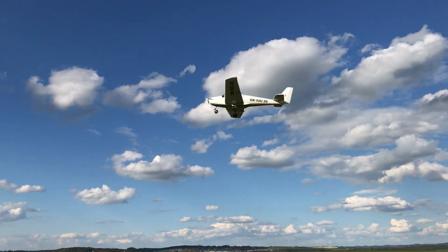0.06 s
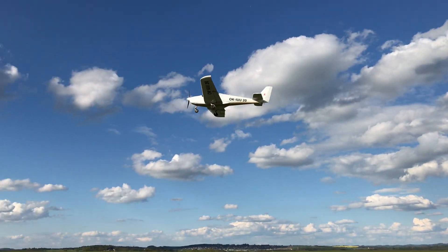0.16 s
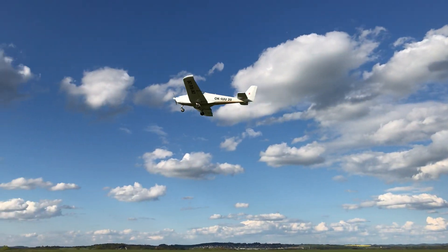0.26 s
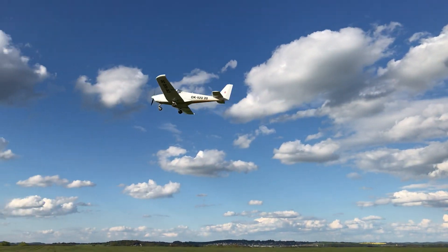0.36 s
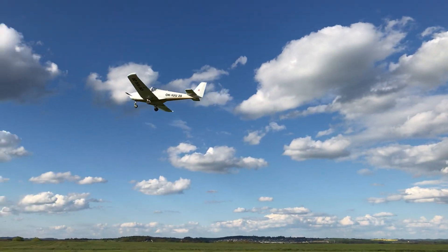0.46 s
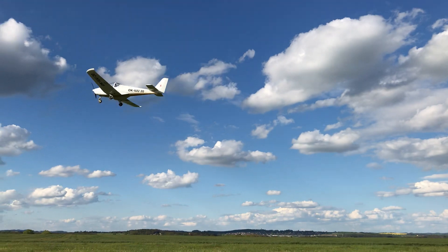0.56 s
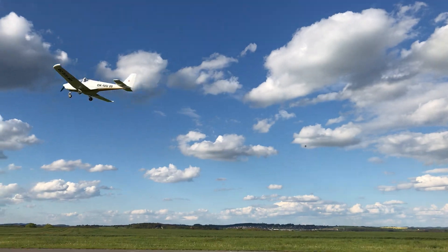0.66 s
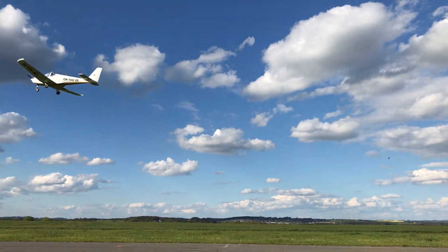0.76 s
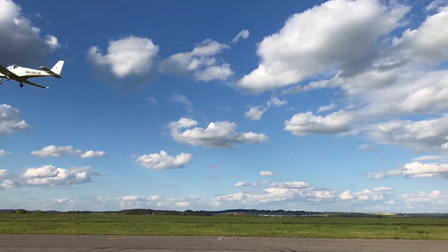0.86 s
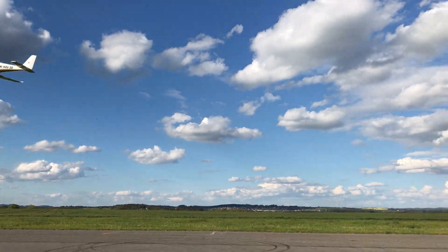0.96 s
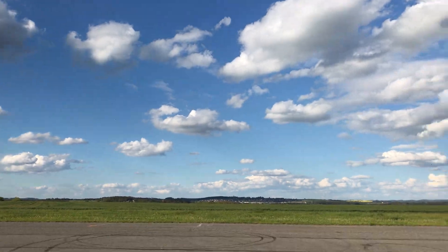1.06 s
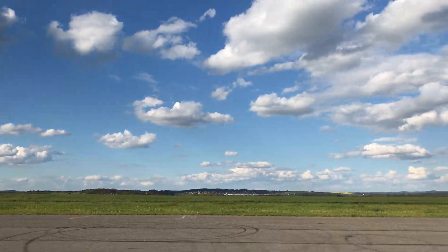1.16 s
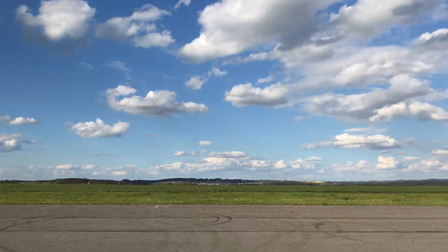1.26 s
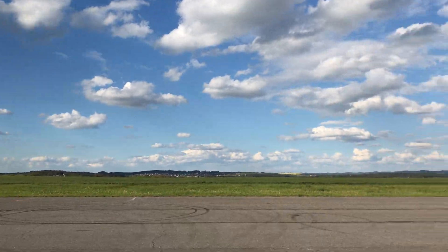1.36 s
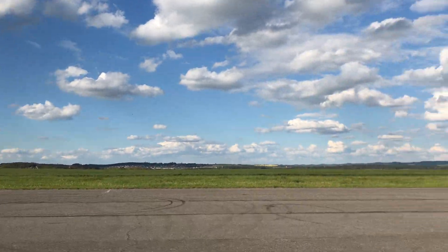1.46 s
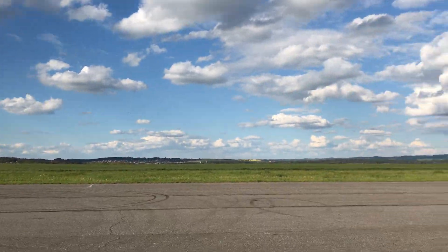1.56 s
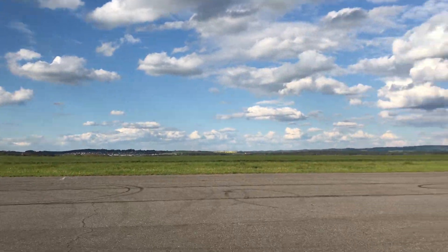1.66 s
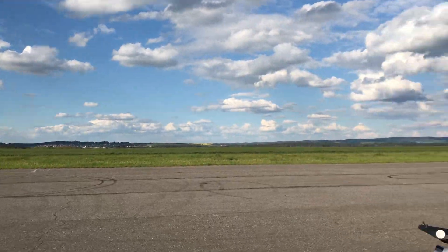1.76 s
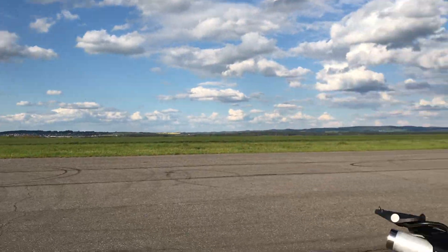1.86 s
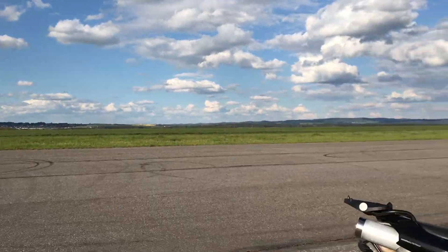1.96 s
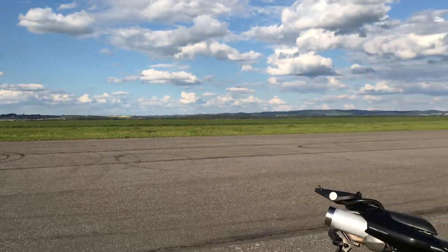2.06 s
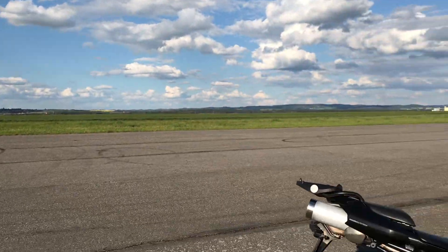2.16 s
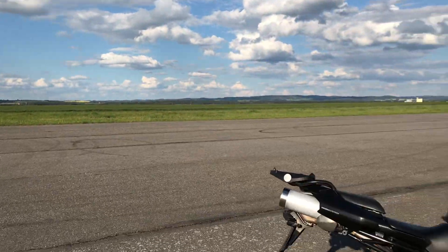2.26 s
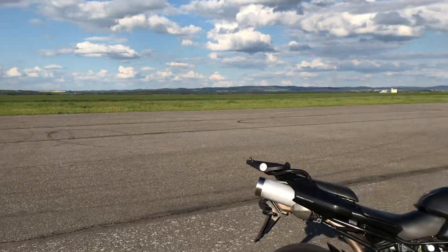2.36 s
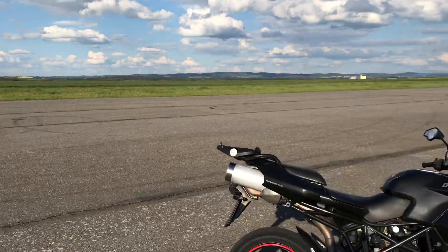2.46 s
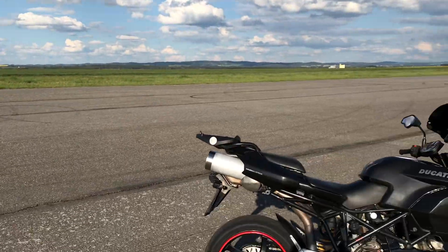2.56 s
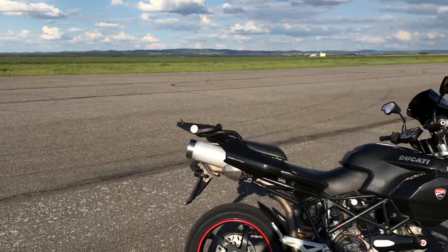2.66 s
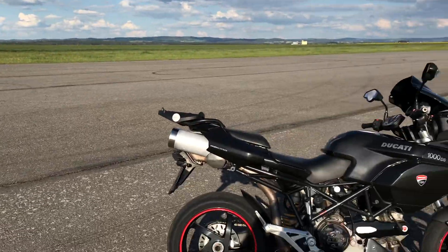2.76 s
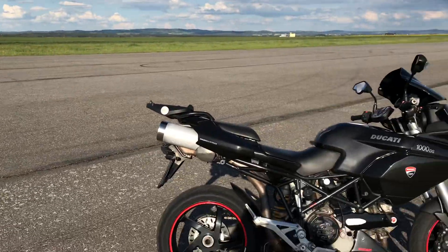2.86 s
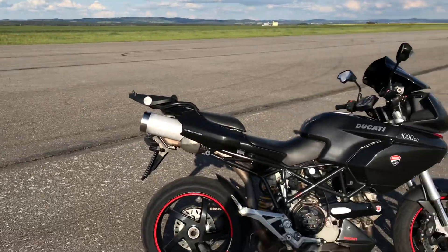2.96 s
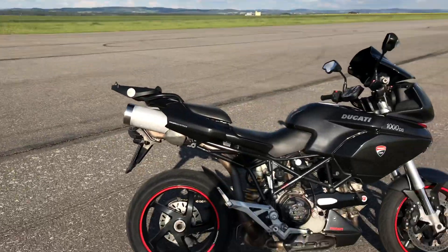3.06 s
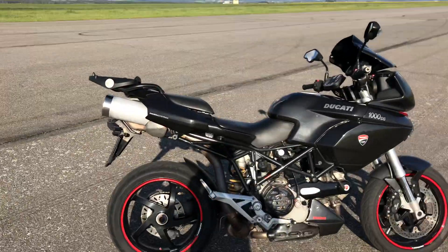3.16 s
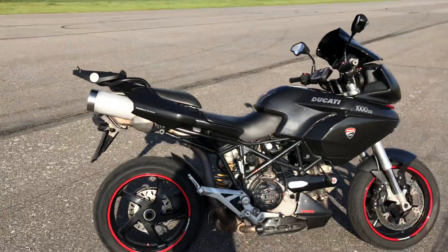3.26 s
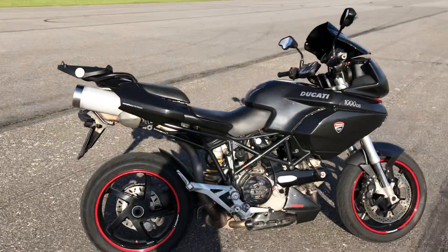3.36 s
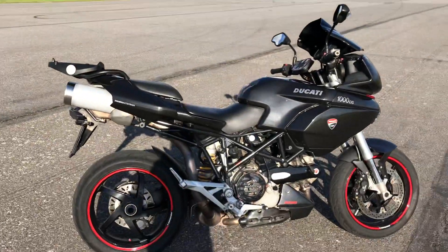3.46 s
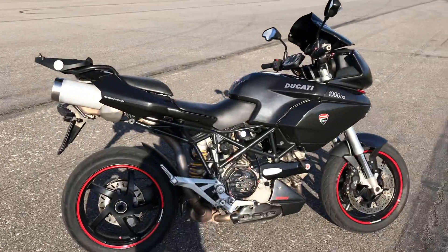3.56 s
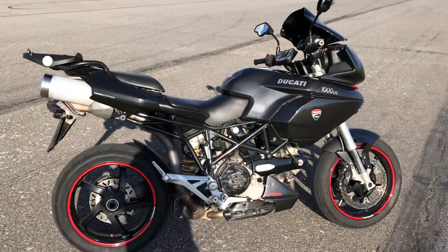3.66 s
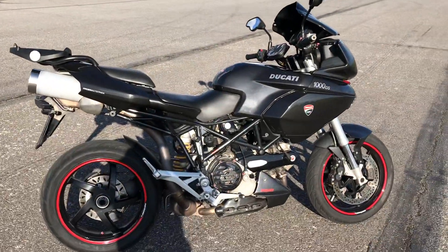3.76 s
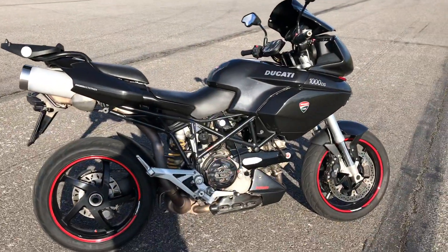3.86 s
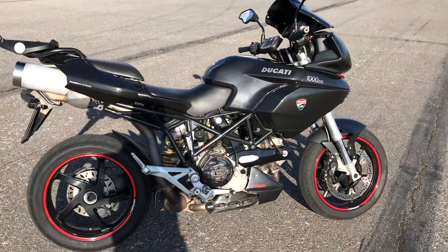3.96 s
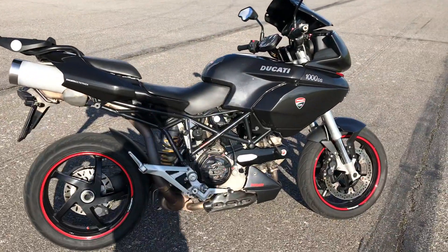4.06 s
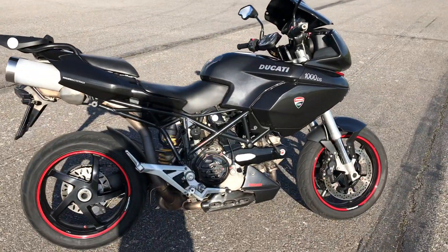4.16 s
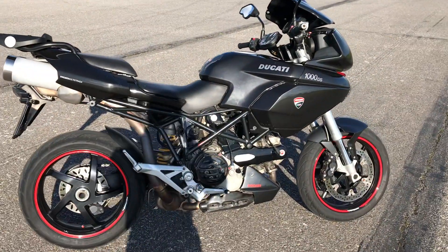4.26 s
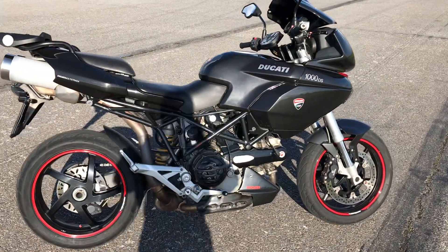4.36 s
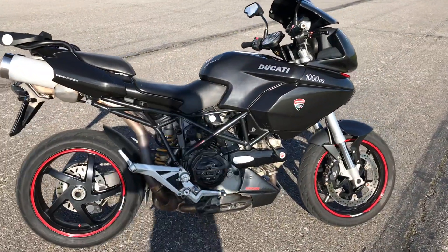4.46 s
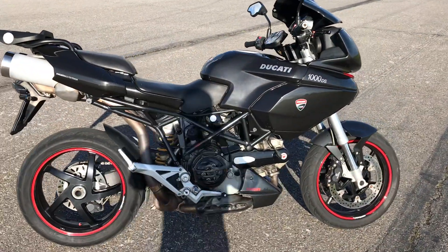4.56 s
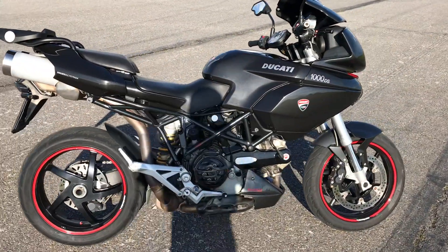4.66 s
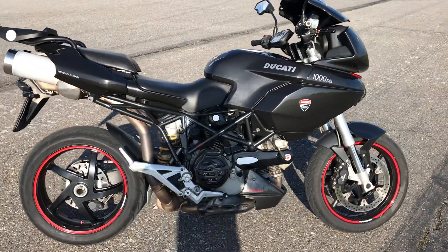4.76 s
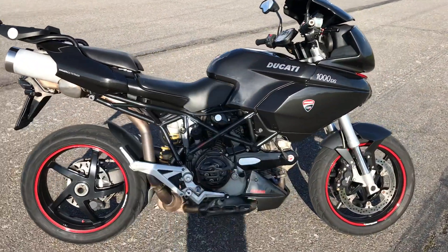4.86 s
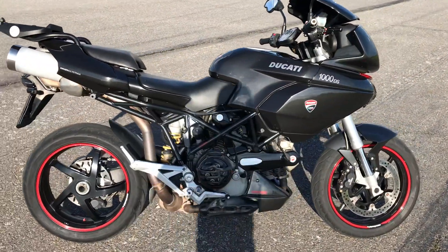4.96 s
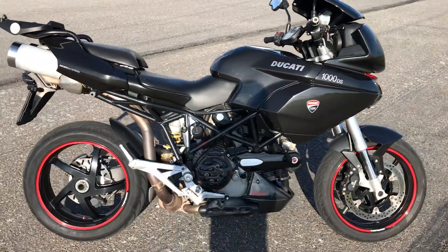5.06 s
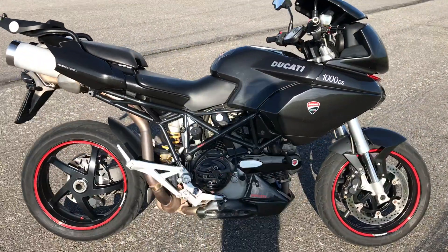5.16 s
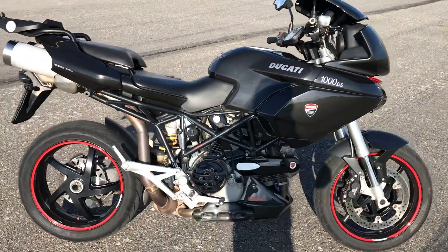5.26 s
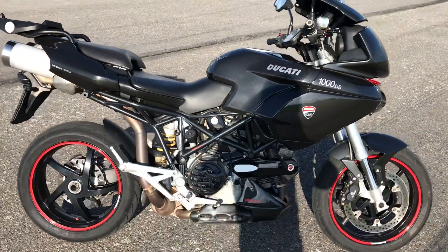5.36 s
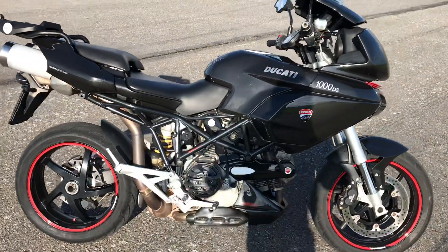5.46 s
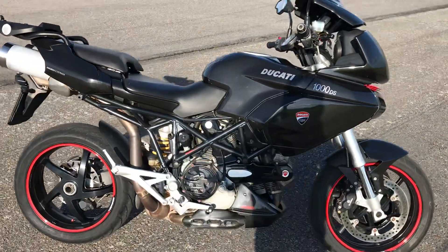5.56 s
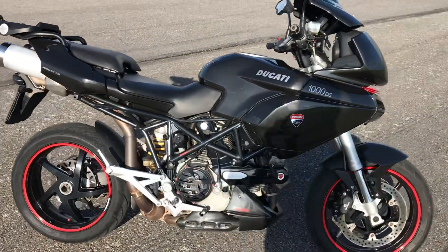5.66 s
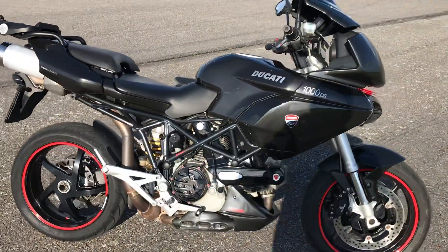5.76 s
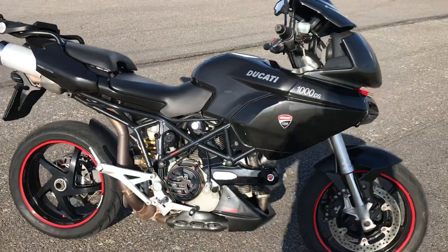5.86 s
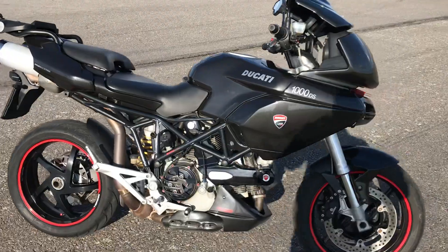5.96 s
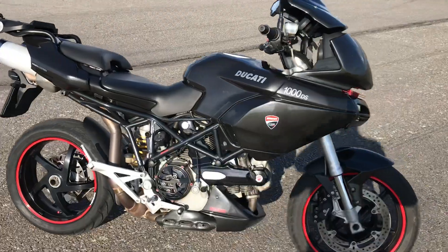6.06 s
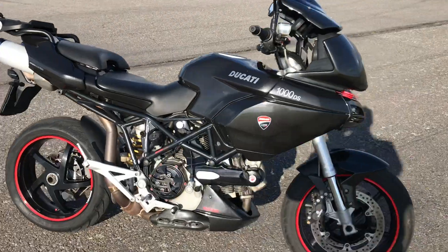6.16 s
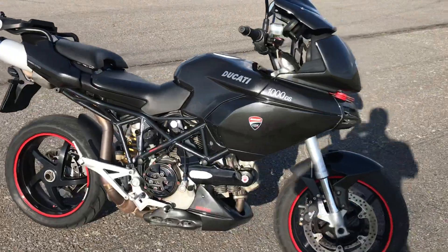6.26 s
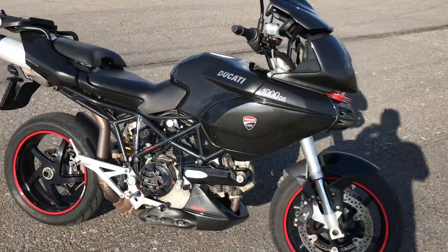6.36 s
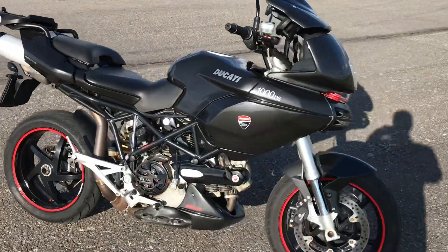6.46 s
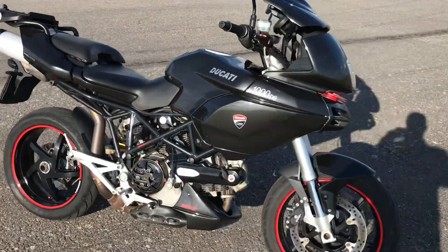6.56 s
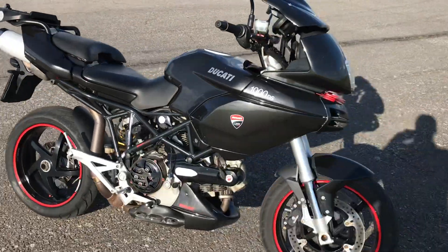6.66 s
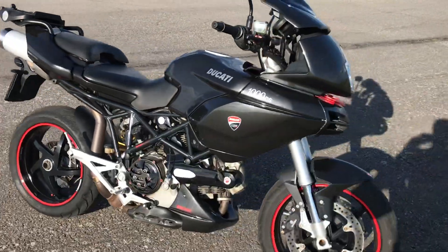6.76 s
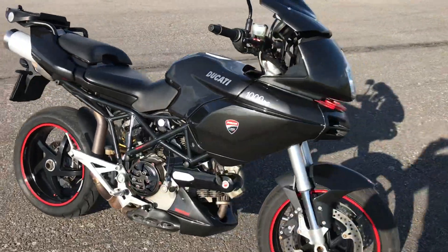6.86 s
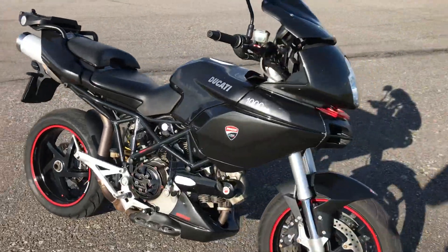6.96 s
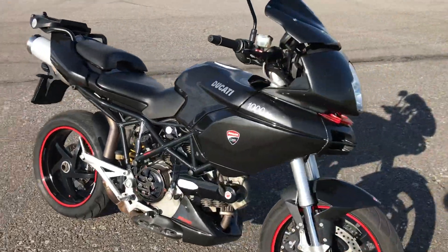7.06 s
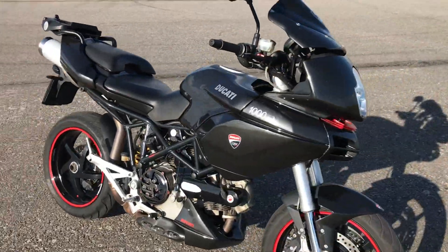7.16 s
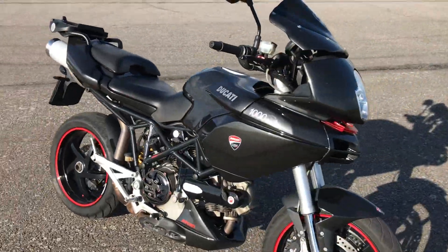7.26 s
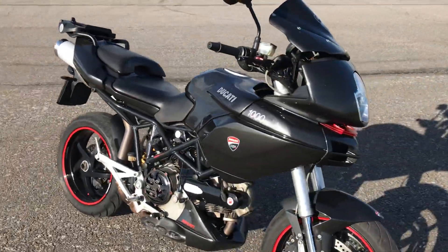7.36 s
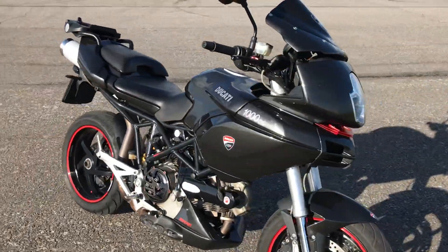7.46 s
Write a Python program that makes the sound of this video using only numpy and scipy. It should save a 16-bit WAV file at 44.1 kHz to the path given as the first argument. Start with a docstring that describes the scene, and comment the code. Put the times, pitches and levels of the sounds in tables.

```python
"""A light propeller plane has just passed low over an open airfield and climbs away, its note sinking.
The geared two-blade propeller hums as a stack of sine lines; the four-cylinder exhaust rasps as coloured
noise, steep shocks and lines on the engine cycle. A delayed echo off the tarmac sweeps a comb through both.
As the plane fades, wind noise, thumps and knocks buffet the microphone.
Far off, a small bird twitters in gliding whistles."""
import sys
import numpy as np
from scipy import signal
from scipy.fft import rfft, irfft
from scipy.io import wavfile
from scipy.ndimage import uniform_filter1d, minimum_filter1d, map_coordinates

SR = 44100
rng = np.random.default_rng(int(sys.argv[2]) if len(sys.argv) > 2 else 0)


def store_pcm(level_fs):
    """Save levels as 16-bit WAV."""
    pcm = np.round(np.clip(level_fs, -1, 1) * 32767).astype(np.int16)
    wavfile.write(sys.argv[1], SR, np.atleast_2d(pcm).T)


N = 330750
TIME = np.arange(N) / SR
CUTOFF_HZ = 15700   # top of the finished sound


def from_db(db):
    """Decibels to gain."""
    return 10 ** (np.asarray(db) / 20)


def rms_one(x):
    """Scale to unit power."""
    return x / np.sqrt(np.mean(x ** 2) + 1e-20)


def evened(x):
    """Hold the slow level at 1."""
    return x / np.sqrt(uniform_filter1d(x * x, size=6000) + 1e-12)


def in_time(rows):
    """One curve over time for each column of a table."""
    s, *columns = np.transpose(rows)
    return [np.interp(TIME, s, column) for column in columns]


def hump(s, half_s):
    """A Gaussian bell of height 1 around a moment."""
    return np.exp(-((TIME - s) / half_s) ** 2 / 2)


def receding(near, far, half_s, width_s):
    """A smooth step from the value close by to the value far off, half done at half_s."""
    return far + (near - far) * (1 - np.tanh((TIME - half_s) / width_s)) / 2


def drift(rate_hz):
    """Smoothed chance with a spread of 1, drawn at every 40th sample."""
    step = 40
    r = np.exp(-2 * np.pi * rate_hz * step / SR)
    noise = rng.standard_normal(N // step + 2002)
    slow = rms_one(signal.lfilter([1], [1, -2 * r, r * r], noise)[2000:])
    return np.interp(np.arange(N) / step, np.arange(len(slow)), slow)


def coloured(x, spectrum):
    """Give a sound a spectrum; unit power."""
    hz, db = np.transpose(spectrum)
    bins = np.maximum(np.fft.rfftfreq(N, 1 / SR), 1)
    gain = from_db(np.interp(np.log(bins), np.log(hz), db))
    return rms_one(irfft(rfft(x) * gain, N))


def band(x, edges_hz, kind, order=2):
    """Butterworth filter."""
    return signal.sosfilt(signal.butter(order, edges_hz, kind, fs=SR, output="sos"), x)


def dulled(x, corner_hz):
    """Gentle low-pass without delay."""
    return signal.sosfiltfilt(signal.butter(1, corner_hz, fs=SR, output="sos"), x + 1e-18)


def delayed(x, lag_ms):
    """Read a sound a little later, between samples if need be."""
    return map_coordinates(x, [np.arange(N) - lag_ms * SR / 1000], order=3)


def background_hiss():
    """Faint even white noise."""
    return from_db(-80.0) * rng.standard_normal(N)


# bird notes: start_s, length_s, first_hz, last_hz, level_db (before the bird's fader), quiver_share (of pitch)
BIRD_NOTES = [(4.54, 0.22, 3080, 2710, -67, 0.022), (5.09, 0.1, 4870, 4550, -79, 0.0088),
              (5.56, 0.053, 5900, 5300, -71, .014), (5.635, 0.041, 5200, 4950, -74, .014),
              (5.66, .03, 4650, 4400, -65, .012), (5.715, 0.029, 5300, 4950, -72, .012),
              (5.773, 0.093, 3710, 3690, -58.5, 0.0087), (5.857, 0.19, 3700, 3660, -62.5, 0.026),
              (6.184, 0.26, 3770, 3720, -63, 0.042), (6.33, 0.12, 4670, 4540, -65, 0.024),
              (6.52, .125, 4980, 4760, -70.5, 0.013), (6.635, .03, 4760, 4280, -71, 0.014),
              (6.82, .05, 5420, 5620, -70, .022), (7.436, .07, 4210, 3860, -63, .02)]


def bird():
    """Thin gliding whistles and buzzy notes: quick random pitch quiver makes the buzz, and the level flutters."""
    out, quiver, flutter = np.zeros(N), drift(290), from_db(2 * drift(40))
    for s, length_s, first_hz, last_hz, db, rough in BIRD_NOTES:
        on = (TIME >= s) & (TIME < s + length_s)
        part = (TIME[on] - s) / length_s
        hz = (first_hz + (last_hz - first_hz) * part) * (1 + rough * quiver[on])
        swell = np.sqrt(2 * np.abs(np.sin(np.pi * part)))
        out[on] += from_db(db) * swell * np.sin(2 * np.pi * np.cumsum(hz) / SR)
    return out * flutter


# spectrum of wind on the microphone: pitch_hz, relative_level_db (per Hz)
WIND_COLOUR = [(20, -11), (35, -6), (55, 7), (80, 2), (150, -1), (230, -6.5), (400, -17.5), (700, -24),
               (1500, -27), (5000, -63)]
# gusts: centre_s, half_length_s (of the bell in power), level_db, low_pass_hz
GUSTS = [(.3, 0.27, -32.5, 291.4), (1.746, 0.046, -28.5, 148), (2.76, 0.12, -34.5, 200),
         (3.57, 0.11, -31, 500), (4.146, 0.29, -33.5, 586), (4.843, 0.44, -33, 121),
         (5.577, 0.25, -34, 312)]
BREEZE_DB = -41.5   # wind between gusts


def wind(lumpy_db):
    """Lumpy low rumble of eddies on the microphone port: a light breeze, with gusts that each reach their own pitch."""
    def eddies():
        lumpy = rng.standard_normal(N) * from_db(lumpy_db * drift(35))
        return coloured(lumpy, WIND_COLOUR)

    out = from_db(BREEZE_DB) * evened(eddies())
    for s, half_s, db, top_hz in GUSTS:
        out += from_db(db) * np.sqrt(hump(s, half_s)) * evened(band(eddies(), top_hz, "low"))
    return out


# single buffets: centre_s, level_db, half_length_s, centre_hz
BUFFETS = [(3.518, -21, 0.009, 80), (3.645, -36, 0.018, 149), (3.682, -28, 0.0079, 130),
           (3.905, -29, 0.0083, 89.5), (3.975, -34, 0.012, 129), (4.233, -38, 0.0044, 176),
           (4.266, -35, 0.016, 159), (4.348, -38, 0.012, 239), (4.941, -21.5, 0.016, 95),
           (5.007, -24.5, 0.0055, 296), (5.045, -22.5, 0.0053, 247), (5.061, -23.5, 0.022, 67),
           (5.457, -20.5, 0.012, 317), (5.466, -23, 0.023, 133), (5.575, -32.5, 0.0035, 286),
           (5.668, -33.5, 0.01, 312), (5.694, -29.5, 0.02, 117), (5.734, -29, 0.0037, 282),
           (6.018, -37.5, 0.03, 93), (6.873, -25, 0.0065, 59.7)]
BUFFET_OCTAVES = 1.48   # width of a buffet's thump
TEAR_DB = -15   # a buffet tears at its crests
# band of the tearing noise: low_hz, high_hz
TEAR_BAND = [500, 1610]


def buffets():
    """Single strong eddies thump on the port: short swells of band noise, each around its own pitch."""
    out, t = np.zeros(N), np.arange(-SR // 4, SR // 4) / SR
    for s, db, half_s, centre_hz in BUFFETS:
        swell = np.exp(-(t / half_s) ** 2 / 2)
        edges_hz = centre_hz * 2 ** (BUFFET_OCTAVES * np.array([-.5, .5]))
        eddy = band(rng.standard_normal(len(t)), edges_hz, "band")
        tear = from_db(TEAR_DB) * rms_one(band(rng.standard_normal(len(t)), TEAR_BAND, "band"))
        puff = swell * band(eddy + swell * np.abs(eddy) * tear, 1500, "low", order=4)
        same_energy = np.sqrt(np.sum(swell ** 2) / np.sum(puff ** 2))
        at = round((s + t[0]) * SR)
        out[at:at + len(t)] += from_db(db) * puff * same_energy
    return out


# eddies that break right on the port with one sharp knock: centre_s, peak_db, half_length_s
KNOCKS = [(3.457, -17, 0.0018), (3.553, -17, 0.0019), (3.559, -27, 0.0012), (3.587, -19, .002),
          (3.667, -19, 0.0015), (3.69, -20, 0.0023), (3.969, -22, 0.0017), (4.243, -21.5, 0.0015),
          (4.285, -21, 0.0018), (4.364, -28, 0.00095), (4.94, -12, 0.002), (5.016, -13, 0.00057),
          (5.051, -13, 0.00077), (5.462, -9.5, 0.00065), (5.467, -9, 0.00096), (5.658, -29, 0.00096),
          (5.708, -17, 0.0032), (5.861, -27, 0.0016), (6.031, -22, 0.0027)]


def knocks():
    """A quick suck of pressure with a rebound on either side."""
    out, t = np.zeros(N), np.arange(-SR // 20, SR // 20) / SR
    for s, db, half_s in KNOCKS:
        at, u = round((s + t[0]) * SR), (t / half_s) ** 2
        out[at:at + len(t)] += from_db(db) * (u - 1) * np.exp(-u / 2)
    return out


# lag of the echo off the tarmac: time_s, lag_ms
ECHO_LAG = [(0, 3.22), (.5, 3.24), (.7, 3.04), (1.0, 2.92), (1.22, 2.56), (1.45, 2.47), (1.85, 2.14),
            (2.25, 1.77), (2.65, 1.58), (2.85, 1.39), (3.8, 1.32), (4.7, 1.08), (6.2, 1.11), (7.5, 1.07)]


def tarmac_echo(x, low_gain, far_gain, blur_hz, wander_ms):
    """The ground mirrors the plane; the lag shrinks as it sinks towards the horizon."""
    lag_ms, = in_time(ECHO_LAG)
    high_gain = receding(near=0.91, far=far_gain, half_s=1.26, width_s=1.6)
    low = dulled(x, blur_hz)
    mirrored = low_gain * low + high_gain * (x - low)
    return x + delayed(mirrored, lag_ms + wander_ms * drift(6.8))


# late on the plane banks and shows its side again: most parts recover a little, the propeller overtones sink
BANK_S, BANK_HALF_S = 7.28, 0.42


def fading(near_db, far_db, half_s, width_s, bank_db):
    """Level of one part of the plane's sound: it falls with distance and shifts by bank_db in the bank."""
    return receding(near_db, far_db, half_s, width_s) + bank_db * hump(BANK_S, BANK_HALF_S)


def tone(turns, waver_db, smear):
    """A sine line whose level and phase waver in turbulent air; smear is in radians."""
    phase = 2 * np.pi * (turns + rng.random()) + smear * drift(11.7)
    return np.sqrt(2) * np.sin(phase) * from_db(waver_db * drift(1.77))


LINE_WAVER_DB, LINE_SMEAR = 1.6, .06   # the lines hold nearly steady in level and phase (radians)


def lines(cycle, table):
    """Unequal cylinders give lines on multiples of the cycle rate."""
    return sum(from_db(db) * tone(k * cycle, LINE_WAVER_DB, LINE_SMEAR) for k, db in table)


def swish(blade):
    """Each blade throws a puff of tip noise at the listener while the plane is abeam."""
    place, sharpness = .62, 3   # place in the blade pass (0-1), how briefly it sounds
    gate = rms_one(np.exp(sharpness * np.cos(2 * np.pi * (blade - place))))
    noise = rms_one(band(rng.standard_normal(N), [900, 1900], "band"))
    level_db = receding(near=-25, far=-63.5, half_s=1.26, width_s=0.59)
    return from_db(level_db) * gate * noise


def buzz(blade, cycle, fall_db):
    """The crank's ripple shifts the high blade harmonics; their hump slides down as the plane turns its tail."""
    centre = receding(near=18.7, far=8.96, half_s=0.14, width_s=2.06)   # loudest harmonic
    level_db = fading(near_db=-29.5, far_db=-55.0, half_s=2.86, width_s=1.98, bank_db=6.0)
    out = 0
    for k in range(8, 21):
        line_db = level_db - fall_db * np.abs(k - centre)
        out = out + from_db(line_db) * tone(k * blade - 2 * cycle, waver_db=0.5, smear=0.21)
    return out


# the propeller is loudest just behind its disc; its tone dies away as the plane shows its tail
LOBE_S, LOBE_DB, LOBE_RISE_DB_PER_S, LOBE_FALL_DB_PER_S = 0.56, -16, 17.5, 6
TAIL_ON_S, TAIL_ON_DB, BLADE_FAR_DB = 2.75, -5.5, -52


def blade_level(bank_db):
    """The propeller's lobe sweeps over the listener and leaves a faint hum."""
    before_db, after_db = LOBE_RISE_DB_PER_S * (LOBE_S - TIME), LOBE_FALL_DB_PER_S * (TIME - LOBE_S)
    lobe_db = LOBE_DB - np.maximum(before_db, after_db)
    tail_db = receding(0, TAIL_ON_DB, TAIL_ON_S, width_s=0.093)
    return np.maximum(lobe_db + tail_db, BLADE_FAR_DB + bank_db * hump(BANK_S, BANK_HALF_S))


# overtones of the blade tone: harmonic, level_db (before their shared fade)
OVERTONES = [(2, 4), (3, -4.5), (4, -7.5), (5, -22)]
# low exhaust lines around the firing tone: cycle_multiple, level_db (before their shared fade)
THROB_LINES = [(2, -4.5), (3, -11.5), (4, 2.5)]
# the growl above them, which the tail screens off and the bank brings back: cycle_multiple, level_db (before fade)
GROWL_LINES = [(5, -12), (6, -9), (7, -9.5), (8, -7), (9, -11.5), (10, -18.5), (11, -9.5)]


def drone(blade, cycle):
    """The blade tone with its overtones, the throb around four firings a cycle, and the growl above it."""
    overtone_db = fading(near_db=-23.0, far_db=-57.0, half_s=1.76, width_s=0.89, bank_db=-11)
    throb_db = fading(near_db=-32.0, far_db=-56.5, half_s=3.02, width_s=1.32, bank_db=11.5)
    growl_db = fading(near_db=-34.0, far_db=-60.0, half_s=3.0, width_s=1.0, bank_db=16.5)
    hum = from_db(blade_level(bank_db=4.0)) * tone(blade, waver_db=-0.5, smear=0.033)
    overtones = sum(from_db(db) * tone(k * blade, LINE_WAVER_DB, 2 * LINE_SMEAR) for k, db in OVERTONES)
    throb = from_db(throb_db) * lines(cycle, THROB_LINES)
    growl = from_db(growl_db) * lines(cycle, GROWL_LINES)
    return hum + from_db(overtone_db) * overtones + throb + growl


# moving air makes the exhaust swell and sink: centre_s, half_length_s, bass_db, treble_db
SWELLS = [(1.227, 0.51, -2.5, 4.5), (2.063, 0.063, -0.5, 5), (2.36, 0.15, -0.5, 9), (3.07, 0.11, 2.5, 4.5),
          (3.49, 0.075, 1, 5), (3.74, 0.1, -1.5, -2.5), (4.934, 0.2, 3.5, 4.5), (5.31, 0.088, 6, 6.5),
          (5.612, 0.12, -1.5, 0), (6.091, 0.16, 6.5, 5), (6.41, 0.073, 3.5, 7), (6.933, 0.025, -3, 9),
          (7.063, 0.12, -6, -3), (7.2, 0.025, 3, 3), (7.33, 0.025, 1.5, 4.5), (7.473, 0.022, 0, 5.5)]


def exhaust_levels(flicker_db):
    """Roar, rasp and hiss in dB; the hiss falls furthest and flickers most."""
    bass_db = sum(db * hump(s, half_s) for s, half_s, db, _ in SWELLS)
    treble_db = sum(db * hump(s, half_s) for s, half_s, _, db in SWELLS) + flicker_db * drift(5.5)
    roar_db = fading(near_db=-16.5, far_db=-47.5, half_s=2.72, width_s=2.5, bank_db=6.5) + bass_db
    rasp_db = fading(near_db=-20.5, far_db=-51.0, half_s=2.09, width_s=1.39, bank_db=6.5)
    rasp_db = rasp_db + (bass_db + treble_db) / 2
    hiss_db = fading(near_db=-20.5, far_db=-65.5, half_s=2.2, width_s=1.85, bank_db=1.5) + treble_db
    return roar_db, rasp_db, hiss_db


# the cylinders fire unequally, only two hard enough to crack: cycle_place (0-1),
# level_db (in full for the shocks, halved for the puffs)
FIRINGS = [(0, 2.5), (0.27, -6)]
PUFF_SPREAD_DB, SHOCK_SPREAD_DB = 1.5, 2.5   # no two puffs or shocks are equally strong


def exhaust_bursts(cycle, cycle_hz, crack_s, tail_s, tail_db, repeat, crack_hz):
    """Steady rush, plus a puff of gas with a short tail at each firing; part of the treble repeats each cycle."""
    crack_db = receding(near=7.26, far=2.8, half_s=2.7, width_s=0.48)   # the air blurs puffs from afar
    burst = 0
    for place, db in FIRINGS:
        age_s = ((cycle - place) % 1) / cycle_hz
        firing = (cycle + 1 - place).astype(int)
        uneven_db = PUFF_SPREAD_DB * np.tanh(rng.standard_normal(size=400))[firing]
        decay = np.exp(-age_s / crack_s) + from_db(tail_db) * np.exp(-age_s / tail_s)
        burst = burst + from_db(crack_db + db / 2 + uneven_db) * decay
    pattern = rng.standard_normal(size=256)
    places = np.arange(len(pattern)) / len(pattern)
    repeated = np.interp(cycle + 0.0033 * drift(11.3), places, pattern, period=1)
    rush = rng.standard_normal(N) + repeat * band(repeated, [1800, 4500], "band")
    crack = rush * (np.sqrt(1 + burst ** 2) - 1)
    return rush + band(crack, crack_hz, "low", order=1)   # the puffs are duller than the rush


def shimmer(x, near_db, far_db):
    """Eddies in the air let neighbouring pitch regions swell and fade apart, about equally near and far."""
    bins, centres_hz = np.fft.rfftfreq(N, 1 / SR), np.geomspace(500, 8000, num=16)
    spectrum, patchy_db = rfft(x), receding(near_db, far_db, half_s=4.9, width_s=1.0)
    out = 0
    for peak in np.eye(len(centres_hz)):
        region = irfft(spectrum * np.interp(bins, centres_hz, peak), N)
        out = out + region * from_db(patchy_db * drift(12.5))
    return out


# exhaust colour from the side: pitch_hz, relative_level_db (per Hz)
ABEAM = [(60, -7), (150, -24), (300, -1), (600, -5.5), (1200, -4), (1550, -5), (2100, -6), (2900, 2),
         (3600, -2.5), (4200, 3), (5000, -2), (6500, -3.5), (10400, -17), (15700, -26.5)]
# exhaust colour going away: pitch_hz, relative_level_db (per Hz)
ASTERN = [(60, -2), (200, 0), (600, -1.5), (1150, 2.5), (1550, 4), (1950, -4.5), (2600, 6), (3200, -5.5),
          (3800, 1.5), (4900, -13.5), (6000, -12), (8000, -24.5), (10300, -33.5), (11500, -42),
          (15700, -83)]
# exhaust colour far off: pitch_hz, relative_level_db (per Hz)
FAR = [(60, -33), (200, -25), (400, 11), (650, 9), (1000, 4), (1400, 3), (1900, 5), (2350, -5),
       (3200, -9.5), (3800, -9), (4800, -23), (6500, -32.5), (8000, -44.5), (10400, -51), (15700, -42)]


def exhaust_noise(bursts, roar_db, rasp_db, hiss_db):
    """The colour turns as the plane shows its tail; roar, rasp and hiss are three bands with their own levels."""
    turns_at_s = [.6, 2.3, 3.1, 4.6]
    noise = np.interp(TIME, turns_at_s, [0.44, 0.041, 0.1, 0.00053]) * coloured(bursts, ABEAM)
    noise += np.interp(TIME, turns_at_s, [0.017, 1, 1.0, 0.0066]) * coloured(bursts, ASTERN)
    noise += np.interp(TIME, turns_at_s, [0.0, 0.2, 0.6, 0.46]) * coloured(bursts, FAR)
    roar_db = roar_db + receding(near=-6.5, far=-3.0, half_s=0.69, width_s=0.5)
    hiss_db = hiss_db + receding(near=-0.4, far=4.1, half_s=2.6, width_s=0.8)
    roar = from_db(roar_db) * evened(band(noise, 1827, "low", order=6))
    rasp = from_db(rasp_db - 2.0) * evened(band(noise, [1800, 4800], "band", order=5))
    hiss = from_db(hiss_db) * evened(band(noise, 4505, "high", order=6))
    return roar + rasp + hiss


# the pipe's ring swells as peaks of the tarmac-echo comb sweep across its pitch: centre_s, half_length_s, level_db
RING_SWELLS = [(0.763, 0.17, 11), (1.33, 0.097, 16.5), (2.046, 0.078, 13.5)]
RING_HZ, RING_WIDTH_HZ = 2600, 146   # nasal ring of the pipe
SHOCK_LAG_S = 0.00024   # from a firing to its shock
PIPE_TRIP_MS = 0.747   # the shock runs back along the pipe and comes out once more
EDGE_DB = -20   # the steepest part of the shock, heard only close by; before its bandwidth boost


def exhaust_shocks(cycle, uneven_db, jitter_s, near_low_hz, far_low_hz, near_hz, far_hz, pipe_hz):
    """Each firing leaves the pipe as one steep shock, then again after a pipe trip; distance rounds the front."""
    clicks = np.zeros(N + 1)
    for place, db in FIRINGS:
        s = np.interp(np.arange(1, int(cycle[-1])) + place, cycle, TIME)
        late, strong = rng.standard_normal((len(s), 2)).T
        position = np.clip((s + SHOCK_LAG_S + jitter_s * late) * SR, 0, N - 1)
        at, part = np.divmod(position, 1)   # share each click between two samples
        strength = from_db(db + uneven_db * np.tanh(strong))
        clicks[at.astype(int)] += strength * (1 - part)
        clicks[at.astype(int) + 1] += strength * part

    def front(low_hz, top_hz):
        shape = band(signal.unit_impulse(256), low_hz, "high", order=1)
        shape = band(shape, top_hz, "low", order=4)
        return np.convolve(clicks, shape / shape.max())[:N]

    sharp = receding(near=0.97, far=0, half_s=1.6, width_s=0.51)
    edge = from_db(EDGE_DB) * front(near_low_hz, CUTOFF_HZ) * CUTOFF_HZ / near_hz
    near_shocks = front(near_low_hz, near_hz) + sharp * edge
    shocks = sharp * near_shocks + (1 - sharp) * front(far_low_hz, far_hz)
    peak = signal.iirpeak(RING_HZ, RING_HZ / RING_WIDTH_HZ, fs=SR)
    ring_gain = sum(from_db(db) * hump(s, half_s) for s, half_s, db in RING_SWELLS)
    ring = ring_gain * signal.lfilter(*peak, shocks + 1e-18)
    return_gain = receding(near=0.33, far=0.75, half_s=0.8, width_s=.7)
    return shocks + ring + return_gain * delayed(dulled(shocks, pipe_hz), PIPE_TRIP_MS)


# blade passes as heard, lowered by the Doppler shift: time_s, blade_rate_hz
BLADE_RATE = [(0, 85.2), (.3, 83.0), (.5, 81.75), (.75, 80.6), (1, 79.75), (1.25, 78.9), (1.6, 78.35),
              (2, 77.5), (3, 76.65), (4, 76.45), (4.7, 76.42), (5.15, 76.7), (5.8, 76.3), (6.3, 76.2),
              (6.7, 76.15), (7.1, 76.67), (7.5, 76.95)]
# middle exhaust lines: cycle_multiple, level_db (against the roar level)
ROAR_LINES = [(13, -18.5), (14, -19), (15, -18.5), (16, -23), (18, -20.5), (19, -18), (20, -22.5),
              (22, -21.5), (23, -22), (24, -20), (26, -20.5), (27, -17), (28, -25.5), (29, -22.5),
              (30, -16.5), (31, -18.5), (33, -25), (34, -20.5), (35, -38), (38, -23.5)]
# lines in the ring of the exhaust pipe: cycle_multiple, level_db (before their shared level)
RING_LINES = [(54, -17), (55, -6), (59, -47), (61, -39), (62, -16), (63, -14)]
CYCLE_PER_BLADE = .570   # engine cycles per blade pass, through the gearbox
FLICKER_DB = .8   # quick flicker of the treble in moving air
RING_FAR_DB, RING_FADE_S = -14, 2.8   # distance smears the high lines


def plane():
    """Propeller and engine turn together through the gearbox."""
    blade_hz, = in_time(BLADE_RATE)
    blade = np.cumsum(blade_hz) / SR   # blade passes so far
    cycle = CYCLE_PER_BLADE * blade + .2   # engine cycles so far
    roar_db, rasp_db, hiss_db = exhaust_levels(FLICKER_DB)

    bursts = exhaust_bursts(cycle, CYCLE_PER_BLADE * blade_hz, crack_s=0.0029, tail_s=0.0047, tail_db=-3.0,
                            repeat=0.61, crack_hz=3840)
    rush = exhaust_noise(shimmer(bursts, near_db=2.45, far_db=2.5), roar_db, rasp_db, hiss_db)

    shock_db = rasp_db + receding(near=17.04, far=1.06, half_s=3.6, width_s=0.7)   # the air wears the shocks down
    shock_db = shock_db + receding(near=0, far=5.8, half_s=4.9, width_s=0.85)   # back as the plane begins to turn
    shocks = from_db(shock_db) * exhaust_shocks(
        cycle, uneven_db=SHOCK_SPREAD_DB, jitter_s=0.00003, near_low_hz=1130, far_low_hz=585,
        near_hz=6550, far_hz=3960, pipe_hz=5460)

    ring_db = rasp_db + receding(near=-4.6, far=RING_FAR_DB, half_s=RING_FADE_S, width_s=0.3)
    notes = from_db(roar_db) * lines(cycle, ROAR_LINES) + from_db(ring_db) * lines(cycle, RING_LINES)
    direct = drone(blade, cycle) + buzz(blade, cycle, fall_db=6.0) + swish(blade) + rush + notes
    rattle = tarmac_echo(shocks, low_gain=0.47, far_gain=0.61, blur_hz=1560, wander_ms=0.018)
    return rattle + tarmac_echo(direct, low_gain=0.79, far_gain=0.034, blur_hz=1490, wander_ms=0.018)


def scene():
    """Plane, wind and bird over a faint even hiss."""
    on_microphone = wind(lumpy_db=5.0) + buffets() + knocks()
    return (background_hiss() + from_db(7.0) * bird() + on_microphone + plane())[None]


def limited(x):
    """Duck smoothly around any peak that would pass the ceiling."""
    ceiling = .96
    gain = np.minimum(1, ceiling / (np.abs(x) + 1e-9))
    return x * uniform_filter1d(minimum_filter1d(gain, size=89), size=89)


def record(dry):
    """The microphone drops the deepest rumble; peaks are limited and the top is cut."""
    heard = limited(band(dry, 32, "high"))
    return signal.sosfiltfilt(signal.ellip(12, .1, 45, CUTOFF_HZ, fs=SR, output="sos"), heard)


dry = scene()
out = record(dry)
store_pcm(out)
```